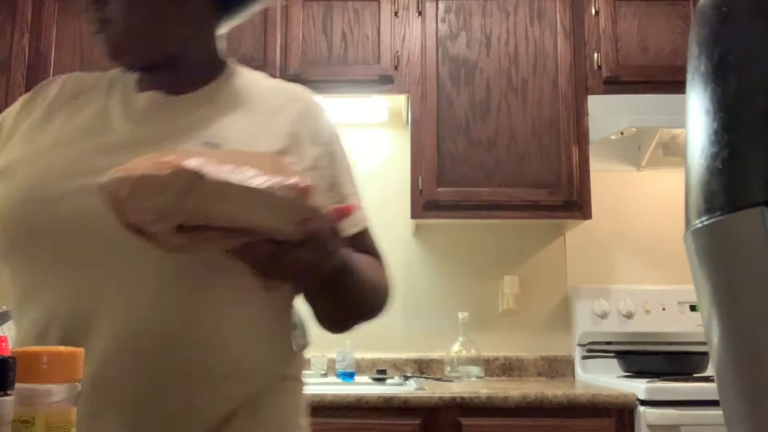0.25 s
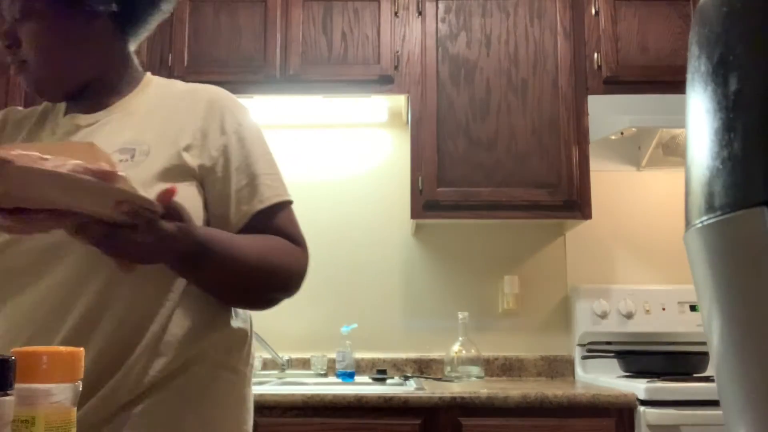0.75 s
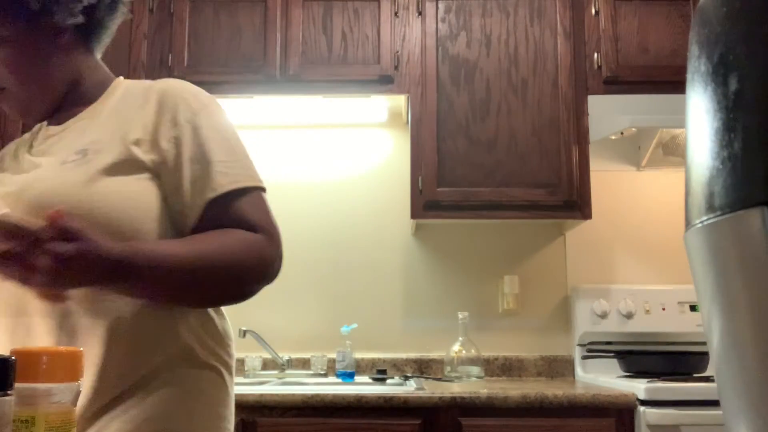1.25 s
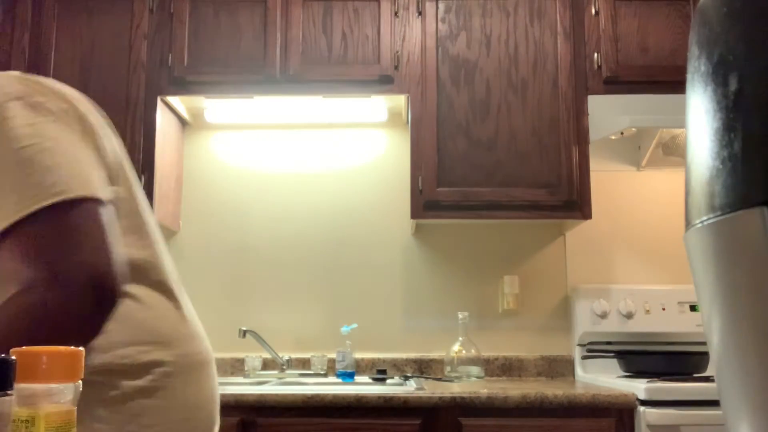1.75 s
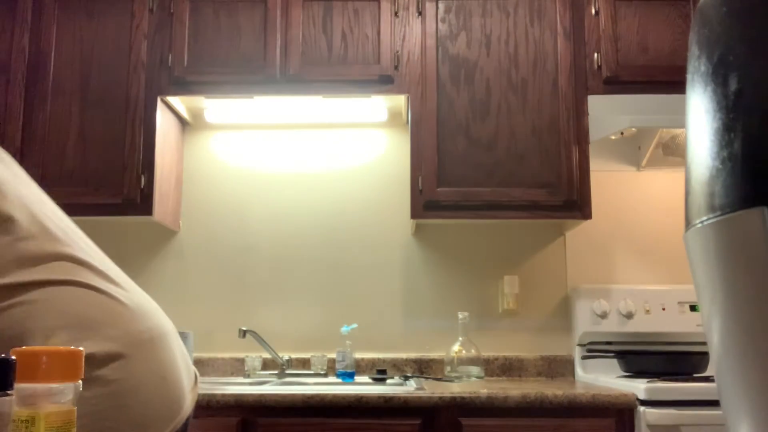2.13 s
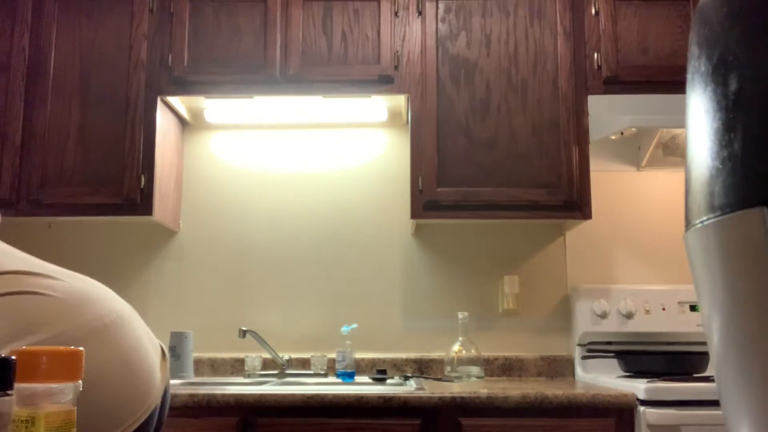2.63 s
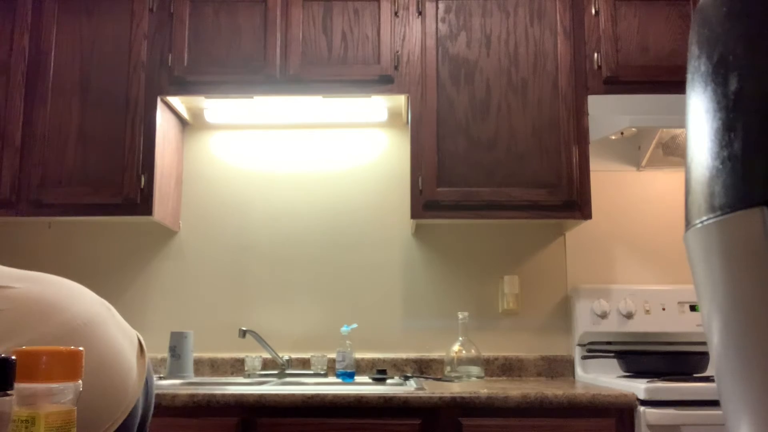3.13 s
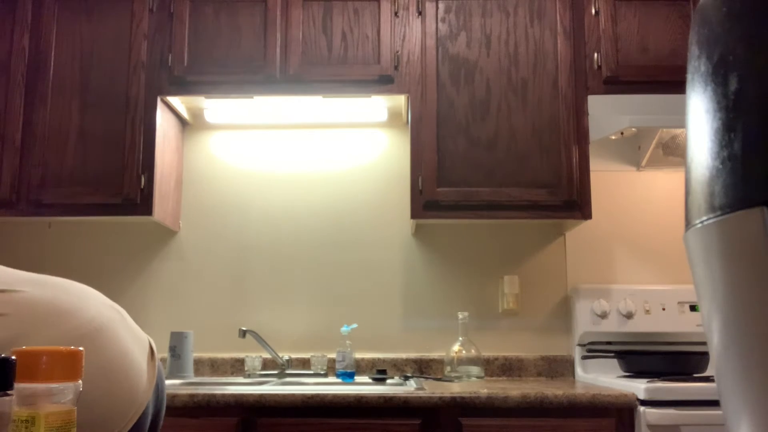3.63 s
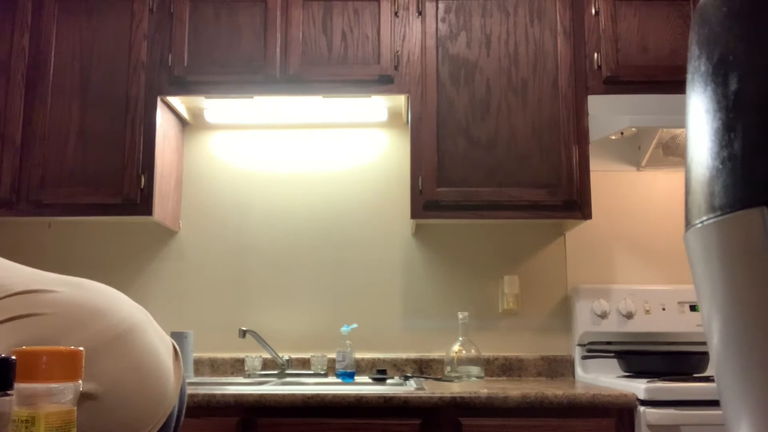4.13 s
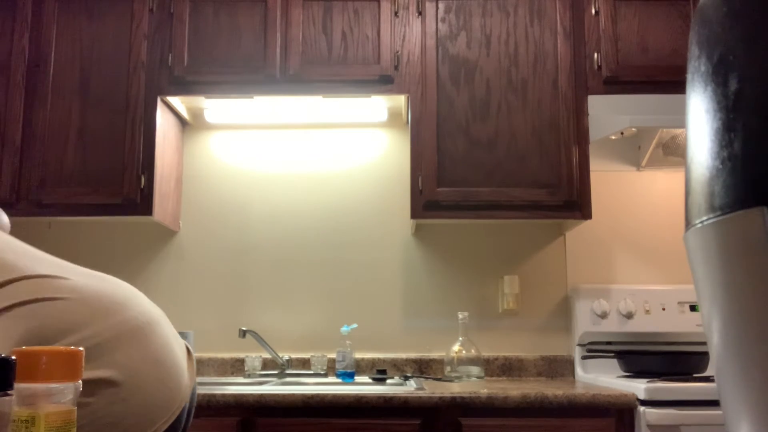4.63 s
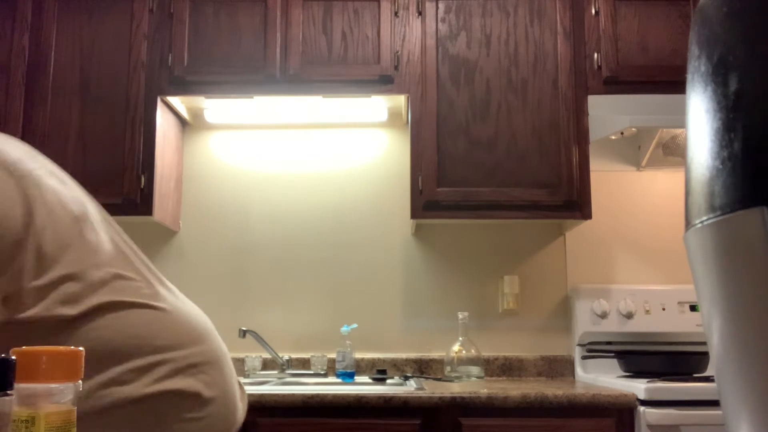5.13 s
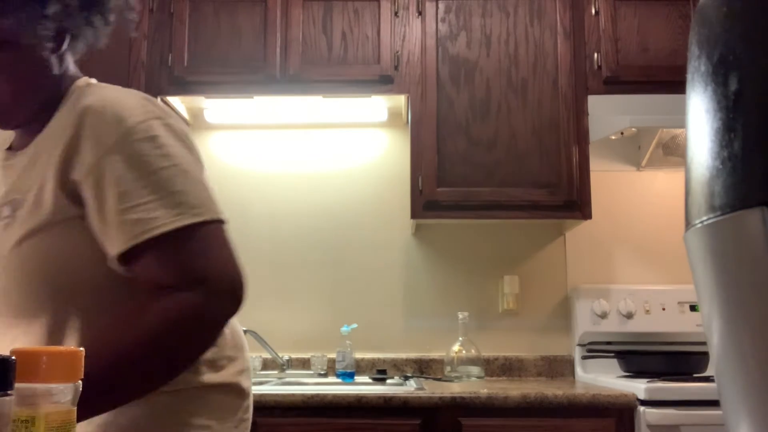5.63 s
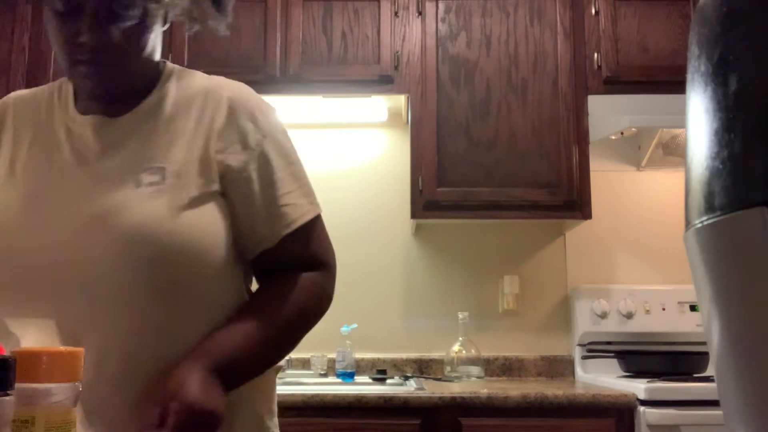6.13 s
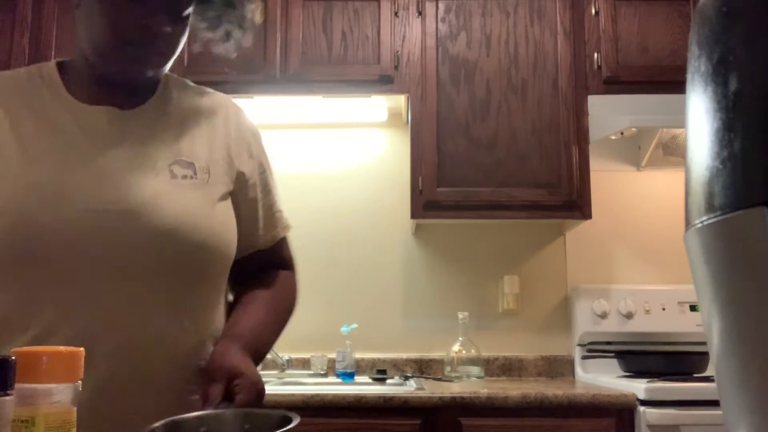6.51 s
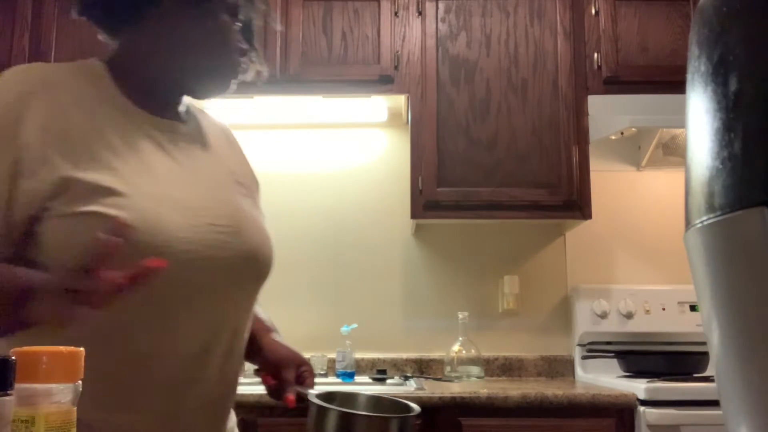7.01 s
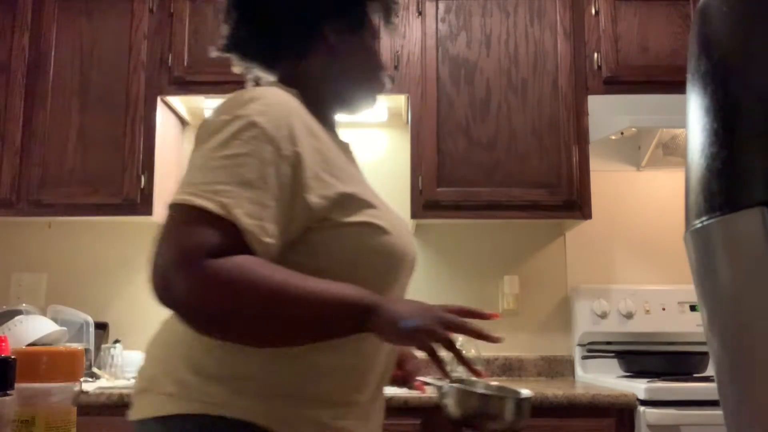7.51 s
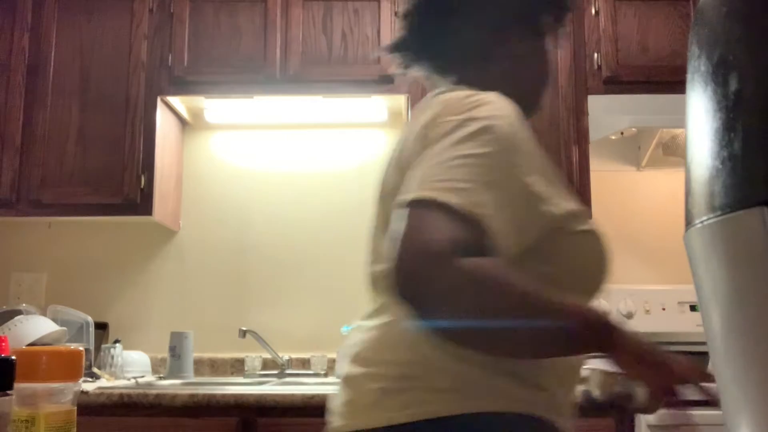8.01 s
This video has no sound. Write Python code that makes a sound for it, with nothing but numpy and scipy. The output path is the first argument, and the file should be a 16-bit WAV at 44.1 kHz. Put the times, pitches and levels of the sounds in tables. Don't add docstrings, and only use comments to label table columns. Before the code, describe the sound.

Low refrigerator hum, crinkling paper and dull bumps, a loud wooden door slam at three seconds, soft shuffling, then a sharp pan clack on the worktop.

```python
import sys
import numpy as np
from scipy import signal
from scipy.io import wavfile
from scipy.ndimage import uniform_filter1d

SR = 44100
rng = np.random.default_rng(int(sys.argv[2]) if len(sys.argv) > 2 else 0)


def transcribe(signal):
    frames = np.atleast_2d(signal).T
    limited = np.clip(frames, -1, 1)
    pcm = np.round(limited * 32767).astype(np.int16)
    wavfile.write(sys.argv[1], SR, pcm)


def invert_db(level):
    return 10 ** (np.asarray(level, dtype=float) / 20)


N = 364707
STEP = 40
CONTROL_S = np.arange(N // STEP + 2) * STEP / SR


def at_hz(points, hz):
    table = np.array(points)
    return np.interp(np.log(hz), np.log(table[:, 0]), table[:, 1])


def rms_one(x):
    return x / np.sqrt(np.mean(np.atleast_2d(x)[0] ** 2) + 1e-20)


def every_sample(slow):
    return np.interp(np.arange(N) / STEP, np.arange(len(slow)), slow)


def drift(rate_hz):
    r = np.exp(-2 * np.pi * STEP * rate_hz / SR)
    wander = signal.lfilter([1], [1, -2 * r, r * r], rng.standard_normal(N // STEP + 2002))
    return rms_one(wander[2000:])


def spread(side_db):
    return invert_db([[0], [side_db]])


def bandpass(x, order, low_hz, high_hz):
    return signal.sosfilt(signal.butter(order, [low_hz, high_hz], "band", fs=SR, output="sos"), x)


EDGES = 20 * 2 ** np.arange(0, 9.8, 1 / 3)


def bands(white, low_hz, high_hz):
    for k, (low, high) in enumerate(zip(EDGES, EDGES[1:])):
        hz = np.sqrt(low * high)
        if low_hz <= hz < high_hz:
            yield hz, bandpass(white[k % 2], 2, low, high)


def ring(x, hz, t60):
    r, w = invert_db(-60 / (t60 * SR)), 2 * np.pi * hz / SR
    return signal.lfilter([0, np.sin(w)], [1, -2 * r * np.cos(w), r * r], x + 1e-18)


def burst(length_ms, low_hz, high_hz, order, side_db):
    t = np.arange(int(.2 * SR)) / SR * 1000 / max(length_ms, .5)
    grit = rng.standard_normal((2, len(t))) * invert_db(2.4 * rng.exponential(1, len(t)) - 4.5)
    return t * np.exp(1 - t) * rms_one(bandpass(grit, order, low_hz, high_hz)) * spread(side_db)


def add(out, s, sound, pan_db):
    at, (mid, side) = int(s * SR), sound
    lean = np.tanh(pan_db * np.log(10) / 40)
    out[:, at:at + len(mid)] += np.array([mid, side + lean * mid])[:, :N - at]


# (frequency [Hz], rms level [dB], t60 [s])
FAN_RINGS = [(467, -74.5, 0.014), (1090, -75.5, 0.025)]


def fan_and_hiss():
    out = invert_db(-97.5) * bandpass(rng.standard_normal((2, N)), 1, 1500, 6000)
    for hz, level_db, t60 in FAN_RINGS:
        air = rng.standard_normal((2, N))
        out += invert_db(level_db) * rms_one(ring(ring(air, hz, t60), hz, t60))
    return out


# (frequency [Hz], density [dB per Hz])
RUMBLE = [(12, -49), (20, -14), (114, -1), (136, -7.5), (167, -10.5), (235, -12.5), (300, -26),
          (458, -20.5), (633, -33.5), (823, -35), (1090, -48.5), (1390, -47.5), (1570, -40.5),
          (1920, -61.5), (2500, -63), (3250, -80), (5500, -120)]
# (frequency [Hz], side minus mid [dB])
RUMBLE_SIDE = [(60, -19.5), (130, -11), (290, -5), (640, 0), (1410, -4), (3100, -5.5), (6820, 1),
               (15000, -2)]
# (frequency [Hz], rms level [dB], width [Hz])
MOTOR = [(119, -46.5, 0.23), (156, -60.5, 2.98), (78.3, -51.5, 7.4), (447, -70.5, 6.2)]


def refrigerator():
    rumble = 0
    for hz, x in bands(rng.standard_normal((2, 2, N)), 20, 2600):
        level = every_sample(invert_db(at_hz(RUMBLE, hz) + 0.38 * drift(15)))
        rumble = rumble + x * spread(at_hz(RUMBLE_SIDE, hz)) * level
    out = invert_db(-48.5) * rms_one(rumble)
    for hz, level_db, width_hz in MOTOR:
        phase = 2 * np.pi * np.cumsum(hz + width_hz * every_sample(drift(3.107))) / SR
        level = np.sqrt(2) * every_sample(invert_db(level_db + 1.1 * drift(1.1)))
        out += level * np.array([np.sin(phase), np.cos(phase)]) * spread(at_hz(RUMBLE_SIDE, hz))
    return out


def gestures(peak_s, level_db, swell_s, fade_s, still_db):
    late = CONTROL_S[:, None] - peak_s
    away = np.maximum(-late / np.maximum(swell_s, 1e-3), late / np.maximum(fade_s, 1e-3))
    shape_db = -20 * away ** 1.09
    return 10 * np.log10(invert_db(2 * (level_db + shape_db)).sum(axis=1) + invert_db(2 * still_db))


# (frequency [Hz], density [dB per Hz])
RUSTLE_MID = [(250, -9), (350, -3.5), (452, -4), (730, -12.5), (1070, -6), (1300, -12.5), (1650, -6.5),
              (3000, -5), (5060, -6), (7400, -20), (9100, -16), (10900, -31.5), (14800, -23.5),
              (16000, -26)]
# (frequency [Hz], side minus mid [dB])
RUSTLE_SIDE = [(200, -12), (380, -2.5), (700, 1.5), (1290, 2.5), (2380, -1), (4400, -2), (7000, 3.5),
               (9000, -0.5), (11500, 3)]
# (peak time [s], level [dB], swell
# [s], fade [s], crisp top re rustle [dB])
RUSTLES = [(0.005, -61, .1, 0.28, -11), (.2, -59.5, 0.065, 0.99, -7), (.5, -60, 0.25, 0.78, 9),
           (.7, -50.5, 0.27, 0.23, -33), (.82, -51.5, 0.16, 0.083, -9), (0.989, -75.5, 0.13, 0.084, -33.5),
           (1.16, -69.5, 0.045, 0.19, -1), (1.3, -66.5, 0.12, 0.26, -20), (1.5, -60, 0.065, 0.4, 1.5),
           (1.78, -53, 0.25, 0.39, -2), (2.108, -58.5, 0.12, 0.19, -5), (2.45, -62, 0.54, 1, -1.5),
           (2.851, -68.5, 0.97, 0.26, -22), (3.074, -50.5, 0.052, 0.22, -1), (3.32, -48.5, 0.35, 0.32, -0.5),
           (3.527, -49.5, 0.089, 0.17, 0.5),
           (3.857, -54.5, 0.015, 0.092, -4.5), (4.0, -69, 0.2, 0.36, -17), (4.357, -69.5, 0.045, .3, -27.5),
         (4.572, -54, 0.24, 0.15, -31), (4.99, -72.5, 0.066, 0.81, -10), (5.2, -71, 0.16, 0.2, -33),
         (5.38, -70, 0.97, 0.11, -5), (5.57, -72, 0.14, 0.38, -23), (5.68, -73, 0.13, .15, -23),
         (5.845, -73.5, 0.49, 0.062, -3), (6.024, -58.5, 0.015, 0.17, -15), (6.215, -61.5, 0.22, 0.42, -11),
         (6.35, -63, 0.063, 0.15, -3), (6.45, -81, 0.056, .1, -18), (6.58, -57.5, 0.019, 0.27, -15),
         (6.78, -66, 0.78, 0.1, -30), (7.11, -72.5, 0.028, 0.17, -1.5), (7.253, -60, 0.071, 0.13, -16),
         (7.49, -62, 0.13, 0.093, -5), (7.8, -63, 0.098, 0.18, 11.5), (7.89, -60, 0.029, 0.1, 2),
         (8.03, -59.5, 0.5, 0.23, -16)]
# (peak time [s], level [dB], swell [s], fade [s])
RUBS = [(.14, -54, .2, 0.07), (.72, -33.5, 0.071, 0.28), (.85, -33.5, 0.075, 0.057),
        (1.45, -58.5, 0.12, 0.18), (3.24, -27, 0.14, 0.087), (3.588, -52, 0.066, 0.089),
        (3.85, -64, 0.011, 0.15), (4.019, -47.5, 0.11, 0.68), (4.305, -44, 0.043, 0.083),
        (4.53, -39.5, 0.13, 0.18), (5.56, -54.5, 0.073, 0.46), (6.257, -49, 0.07, 0.16),
        (6.497, -40, 0.048, 0.13), (6.78, -48.5, 0.21, 0.19), (7.12, -61.5, 0.14, 0.11),
        (8.01, -47.5, 0.19, 0.24)]
# (time [s], peak level [dB])
SNAPS = [(0.053, -44), (0.0704, -43.5), (0.111, -47), (0.157, -44), (0.196, -49), (0.2044, -46),
         (0.2414, -39), (.2314, -48), (.2952, -45), (0.3277, -58), (0.356, -42), (0.7707, -47), (.823, -38),
         (1.0394, -50), (1.064, -53), (1.117, -53), (1.139, -48), (1.277, -51), (1.316, -60), (1.4596, -62),
         (1.4765, -48), (1.5828, -56), (1.6342, -51)]


def rustle():
    # level re peak -16.5 dB, 1.2 ms swell, 29 ms fade, top +1 dB
    snaps = [(s, db - 16.5, 0.0012, 0.029, 1) for s, db in SNAPS]
    s, level_db, swell, fade, crisp_db = np.transpose(RUSTLES + snaps)
    rustle_db = gestures(s, level_db, swell, fade, still_db=-95)
    top_db = gestures(s, level_db + crisp_db, swell, fade, still_db=-86) - rustle_db
    rub_db = gestures(*np.transpose(RUBS), still_db=-64) - rustle_db
    low_db = 10 * np.log10(invert_db(2 * rub_db) + invert_db(2 * 5.5))
    slips = rng.standard_normal((2, 2, N)) * every_sample(invert_db(1.0 * drift(9.6)))
    slips *= invert_db(1.4 * rng.exponential(1, N))
    out, plain_power = 0, 0
    for hz, x in bands(slips, 250, 16500):
        colour_db = at_hz(RUSTLE_MID, hz)
        rubbed = at_hz([(1000, 1), (2300, 0)], hz)
        crisp = at_hz([(6000, 0), (10500, 1)], hz)
        plain_power += (1 - rubbed) * (1 - crisp) * np.mean(x[0] ** 2) * invert_db(2 * colour_db)
        gain_db = colour_db + 1.2 * drift(8.0) + rustle_db + rubbed * low_db + crisp * (top_db + 11.0)
        out = out + x * spread(at_hz(RUSTLE_SIDE, hz)) * every_sample(invert_db(gain_db))
    return out / np.sqrt(plain_power)


def snap_ticks():
    out = np.zeros((2, N))
    for s, peak_db in SNAPS:
        add(out, s, invert_db(peak_db - 8) * burst(0.5, 3500, 15500, order=1, side_db=-8.0), 0)
    return out


# (time [s], level [dB], centre [Hz], length [ms], left minus right [dB])
TAPS = [(.153, -54, 800, 2.5, -3), (3.843, -55.5, 2070, 10, 8), (3.852, -61, 2700, 14, 7),
        (3.853, -60.5, 3940, 14.4, 10), (4.283, -55, 1145, 2.8, 9), (4.286, -65.5, 2100, 6, 11),
        (4.298, -67, 3550, 8, 3), (3.0795, -29, 1500, 1.7, 8), (3.843, -64, 2050, 2, 10),
        (3.846, -62, 4000, 2, 6), (3.872, -59.5, 2070, 8.6, 8), (5.155, -61.5, 2800, 2, 0),
        (5.189, -60, 2500, 2.3, -0.5), (5.82, -76, 4460, 13, 1.5), (6.459, -68, 1086, 5, 2),
        (4.304, -55, 1600, 3.5, 4), (4.306, -62, 2300, 3.8, 12), (4.331, -54.5, 1100, 5.1, 4),
        (6.018, -63.5, 3000, 9.3, 8), (6.234, -56.5, 1130, 8.3, 3), (6.236, -51.5, 2100, 2.7, 8),
        (6.246, -51, 1100, 4.9, 5), (6.252, -51, 1980, 5, 8), (6.28, -55.5, 1050, 2.7, 5),
        (6.293, -65, 1100, 3.7, 5), (6.261, -53, 1150, 3.8, 5), (6.271, -58, 2000, 4.9, 6),
        (6.423, -54, 1100, 4.5, 2), (6.482, -47.5, 620, 5.2, -1), (6.484, -52, 1100, 1.8, 1),
        (6.491, -42.5, 955, 3, 1), (6.503, -53, 1000, 2.5, -3), (6.512, -52, 880, 6, 1),
        (6.525, -60, 1700, 6.7, 6), (6.487, -51.5, 1720, 7.1, 8), (6.493, -58, 2780, 6.6, 8),
        (6.583, -56, 2280, 8.2, 2), (7.089, -75, 1480, 3.8, 14.5), (7.777, -59, 1040, 9, -15.5)]


def taps():
    out = np.zeros((2, N))
    for s, level_db, hz, length_ms, pan_db in TAPS:
        rattle = burst(length_ms, hz / 1.16, hz * 1.126, order=2, side_db=-0.5)
        add(out, s, invert_db(level_db) * rattle, pan_db)
    return out


# (time [s], level [dB])
SLIDE = [
    (4.4, -55.5),
    (4.404, -57.5),
    (4.468, -49.5),
    (4.486, -42),
    (4.604, -43),
    (4.64, -52.5),
    (4.655, -60.5),
    (4.732, -86),
    (4.75, -72),
]
# (frequency [Hz], level [dB], t60 [s])
SLIDE_RINGS = [(201, 0, 0.035), (470, -0.5, 0.0081), (620, -6, 0.014), (860, -7, 0.014), (1100, -5, 0.022),
               (1170, -5, .018), (1600, 0, 0.0099), (1890, -15, 0.0065), (2180, -7, 0.012),
               (3750, -26, .003)]


def slide():
    t = np.arange(N) / SR
    level_db = np.interp(CONTROL_S, *np.transpose(SLIDE))
    grains = rng.standard_normal(N) * (rng.random(N) < 1000 / SR) * invert_db(1.8 * rng.exponential(1, N))
    out = rms_one(sum(invert_db(db) * ring(grains, hz, t60) for hz, db, t60 in SLIDE_RINGS))
    out *= every_sample(invert_db(level_db - 3.0)) * (t > SLIDE[0][0]) * (t < SLIDE[-1][0])
    return np.array([out, 0.24 * out])


# (frequency [Hz], side minus mid [dB])
KITCHEN_SIDE = [(60, -9.5), (110, -16), (200, -1.5), (380, -4), (700, 3), (1290, 3), (2380, -1.5),
                (4400, -1.5), (8120, 4), (15000, 3.5)]


def struck(contacts, body, boom_t60, swell_ms, crack_ms, crack_hz, boom_db, body_db, crack_db, pan_db):
    out, t = np.zeros((2, N)), np.arange(int(.36 * SR)) / SR
    hz, mode_db, t60 = np.transpose(body)[:, :, None]
    decay = invert_db(mode_db - 60 * t / (1.21 * t60)) * (1 - np.exp(-1.5 * hz * t))
    swell = (1 - np.exp(-1000 * t / swell_ms)) * np.cos(np.pi * t / t[-1] / 2)
    wide = invert_db(at_hz(KITCHEN_SIDE, hz) + 0.5)
    luck = rng.standard_normal((len(contacts), 3, len(body), 1))
    for contact, (size, tune, turn) in zip(contacts, luck):
        s, level_db, boom_hz, rel_body_db, rel_crack_db = contact
        phase = 2 * np.pi * (hz * (1 + 0.0041 * tune) * t + turn)
        modes = invert_db(1.8 * size) * decay * np.exp(1j * phase)
        ringing = np.array([modes.real.sum(axis=0), (wide * modes.imag).sum(axis=0)])
        sound = invert_db(rel_body_db + body_db) * ringing * swell
        boom = np.sin(2 * np.pi * boom_hz * t) * swell ** 2
        sound[0] += invert_db(boom_db - 60 * t / boom_t60) * boom
        crack = burst(crack_ms, 580, crack_hz, order=1, side_db=-2.5)
        crack[0] = signal.lfilter([.62], [1, -.38], crack[0])
        sound[:, :crack.shape[1]] += invert_db(rel_crack_db + crack_db) * crack
        add(out, s, invert_db(level_db) * sound, pan_db)
    return out


# (time [s], boom level [dB], boom pitch [Hz], body re boom [dB], crack re boom [dB])
STEPS = [
    (.05, -40, 34.5, -8, -68),
    (.74, -16, 101, -17, -73),
    (.79, -23.5, 35.6, -2, -64),
    (5.82, -27.5, 31.5, 4, -57),
    (5.9, -23.5, 71, -12.5, -56),
    (7.3, -47, 36, -9, -65.5),
]
# (frequency [Hz], level [dB], t60 [s])
FLOOR = [(48, 0.0043, 0.19)]


def footsteps():
    return struck(STEPS, FLOOR, boom_t60=0.21, swell_ms=16.0, crack_ms=5, crack_hz=900,
                  boom_db=-7.0, body_db=-9.5, crack_db=-23.0, pan_db=2.0)


# (time [s], boom level [dB], boom pitch [Hz], body re boom [dB], crack re boom [dB])
BUMPS = [(0.152, -38, 185, -5.5, -26), (0.524, -39.5, 156, -15, 1.5), (0.651, -37, 198, -5, -20.5),
         (0.691, -33, 197, -3, -8), (0.697, -24, 187.4, -20, -26), (.714, -34, 182, -3, -15),
         (0.726, -26.5, 177, -8.5, -31), (0.841, -27, 199, -4.5, -13), (.852, -26.5, 156, -5, -15),
         (0.871, -31.5, 167, -25, -34), (.884, -26, 172, -19, -31), (1.437, -49, 195, -1, -21),
         (3.553, -31.5, 201, -8.5, -19), (3.595, -32, 170, -13, -28), (3.632, -34, 172.7, -38.5, -27),
         (3.692, -36.5, 170, -16.5, -41), (3.846, -38, 159, -6, -14), (4.007, -39.5, 156, -6, -18),
         (4.301, -36.5, 191, -9, -31), (4.311, -32.5, 173, -13.5, -37), (4.327, -39, 181, -15, -32),
         (4.352, -36.5, 185, -17.5, -30), (4.39, -41.5, 198, -7, -28), (4.422, -43.5, 180, -5, -28.5),
         (5.796, -51, 200, -17, -26), (6.824, -41.5, 210, -4, -37), (7.092, -40.5, 204.4, -5.5, -34)]
# (frequency [Hz], level [dB], t60 [s])
CABINET = [(74, 6.5, 0.19), (257, -5, 0.044), (324, 5.5, 0.077), (390.3, 4.5, 0.11), (468, -7, 0.17),
           (551, 0.5, 0.043), (880, -9.5, 0.058), (1040, -12.5, 0.12)]


def cabinet_bumps():
    return struck(BUMPS, CABINET, boom_t60=0.098, swell_ms=1.14, crack_ms=1.8, crack_hz=3500,
                  boom_db=7.5, body_db=-4.0, crack_db=-11.0, pan_db=4.0)


# (time [s], boom level [dB], boom pitch [Hz], body re boom [dB], crack re boom [dB])
CLACK = [
    (6.589, -46.5, 227, -4, 10),
    (6.594, -32, 229, -3, 6.5),
    (6.601, -29, 208, -1.5, -13),
    (6.6045, -20, 230, -14, -15),
    (6.6092, -17.5, 164, -15.5, -20.5),
    (6.62, -32.5, 151, -2, -3),
    (6.635, -32, 174, -13.5, -2.5),
    (6.649, -30, 134, -15.5, -17),
    (6.678, -31, 120, -20.5, -22),
]
# (frequency [Hz], level [dB], t60 [s])
WORKTOP = [(40.6, -4.5, 0.18), (62.2, -6.5, 0.24), (97.4, -0.5, 0.16), (118.5, 3, 0.22), (172, 8, 0.06),
           (231, 5.5, 0.078), (256, -5, 0.053), (319, 5.5, 0.062), (376, -1, 0.054), (408, -5, 0.042),
           (464, -2, 0.057), (529, -7.5, 0.071), (631, -7, 0.081), (800, -8, 0.033), (973, -0.5, 0.035),
           (1070, 0.5, 0.022), (1378, -5.5, 0.022), (2090, -10, 0.015), (3550, -1, 0.018)]


def pan_clack():
    return struck(CLACK, WORKTOP, boom_t60=0.063, swell_ms=0.67, crack_ms=3.6, crack_hz=4080,
                  boom_db=6.0, body_db=3.0, crack_db=2.0, pan_db=3.5)


# (time [s], boom level [dB], boom pitch [Hz], body re boom [dB], crack re boom [dB])
SLAM = [(3.08, -20.5, 188, -1.5, -9), (3.087, -21.5, 158, -3, -2), (3.097, -11, 157.8, -1, -10),
        (3.104, -22.5, 199, 2.5, -8.5), (3.119, -20.5, 157.6, -3, -7.5), (3.13, -21.5, 168, 3.5, -3),
        (3.148, -16, 149, -19, -10), (3.157, -18, 156, -8, -13.5), (3.179, -19, 156, -4.5, -24),
        (3.226, -30, 128, -1, -22), (3.283, -26, 165.3, -16.5, -24), (3.331, -39, 127, -4, -16),
        (3.363, -34.5, 210, -10, -9.5), (3.402, -35.5, 173.5, -10, -29)]
# (frequency [Hz], level [dB], t60 [s])
DOOR = [(80, -11, 0.074), (253.5, -1.5, 0.2), (344, 5.5, 0.1), (372, -2.5, 0.13), (411, -12, 0.07),
        (451, -7.5, 0.13), (481, -9, 0.082), (530, -14.5, 0.18), (611, -6, 0.064), (640, -4, 0.047),
        (665, -14, .05), (800, -3, 0.022), (946, -10, 0.1), (940, -10, .04), (1035, -10, 0.064),
        (1100, -10.5, 0.09), (1184, -10, 0.1), (1252, -14, .05), (1400, -16, 0.025), (1580, -19.5, 0.039),
        (1640, -19, 0.025), (1800, -4.5, 0.02), (2100, -15, 0.018), (2310, -17, 0.054), (3155, -15, 0.04),
        (3700, -13.5, 0.024)]


def door_slam():
    return struck(SLAM, DOOR, boom_t60=0.14, swell_ms=2.6, crack_ms=13.9, crack_hz=2170,
                  boom_db=10.0, body_db=-1.0, crack_db=-7.5, pan_db=4.0)


# (frequency [Hz], t60 [s], level [dB])
KITCHEN = [(60, 0.71, -8.5), (170, 0.46, -9.5), (351, 0.29, -4.5), (700, 0.32, -1.5), (1300, 0.23, -2.5),
           (3000, 0.31, -4.5), (7250, 0.28, -8), (11140, 0.16, -5.5), (15000, 0.16, -7)]


def kitchen(x, rise_ms):
    t, room = np.arange(int(.7 * SR)) / SR, np.array(KITCHEN)
    tail = 0
    for hz, band in bands(rng.standard_normal((2, 2, len(t))), 30, 16500):
        level_db = at_hz(room[:, ::2], hz) - 60 * t / at_hz(room, hz)
        tail = tail + band * invert_db(level_db) * spread(at_hz(KITCHEN_SIDE, hz))
    tail = tail * (1 - np.exp(-1000 * t / rise_ms)) / 30
    return signal.fftconvolve(x[None], tail, axes=1)[:, :N]


def scene():
    blows = footsteps() + taps() + snap_ticks() + slide() + cabinet_bumps() + pan_clack() + door_slam()
    room = invert_db(2.0) * kitchen(blows[0], rise_ms=1.1)
    mid, side = fan_and_hiss() + refrigerator() + rustle() + room + blows
    return np.array([mid + side, mid - side])


def flicker(mid):
    hz, s, frames = signal.stft(mid, SR, nperseg=1024)
    at = np.minimum((s * SR / STEP).astype(int), N // STEP)
    jump_hz = 340
    low = 7850 + jump_hz * np.round(.9 * drift(6)[at])
    high = 10400 + jump_hz * np.round(.8 * drift(5)[at])
    outside = (hz[:, None] < low) | (hz[:, None] > high)
    return signal.istft(frames * outside, SR, nperseg=1024)[1][:N]


# (from time [s], to time [s])
LEAKS = [
    (.05, 0.081),
    (.105, 0.17),
    (.22, .25),
    (1.06, 1.24),
    (1.115, 1.08),
    (1.455, 1.54),
    (3.84, 4.6),
]


def mid_gap(mid):
    notch = signal.cheby2(4, 38, [8600, 9700], "bandstop", fs=SR, output="sos")
    gapped = signal.sosfilt(notch, flicker(mid))
    n = np.arange(N)
    leak = sum((n > start * SR) * (n < end * SR) for start, end in LEAKS) * invert_db(-11.5)
    return gapped + uniform_filter1d(leak, size=200) * bandpass(mid, 4, 7700, 10500)


def roll_off(x):
    return signal.sosfilt(signal.butter(12, 16490, fs=SR, output="sos"), x)


def record(dry):
    left, right = 1.7 * np.tanh(dry / 1.7)
    mid, side = (left + right) / 2, (left - right) / 2
    mid = signal.sosfilt(signal.ellip(8, .5, 50, 15750, fs=SR, output="sos"), mid_gap(mid))
    side = signal.sosfilt(signal.ellip(4, 1, 50, 11600, fs=SR, output="sos"), side)
    ends = np.clip(np.arange(N)[::-1] / 600, 0, 1)
    return roll_off(ends * np.array([mid + side, mid - side]))


dry = scene()
out = record(dry)
transcribe(out)
```